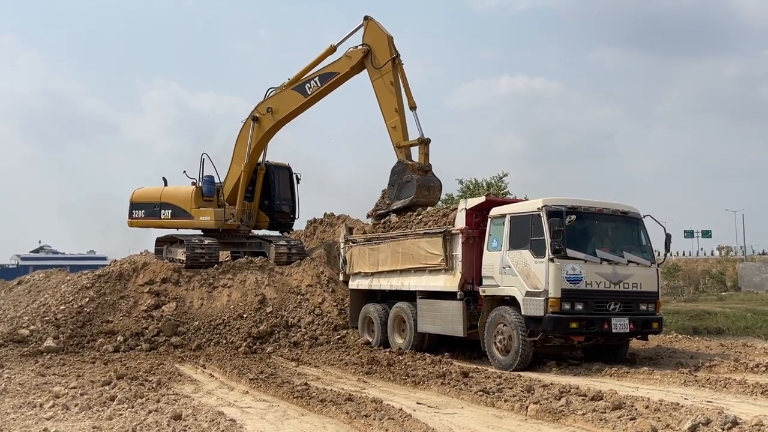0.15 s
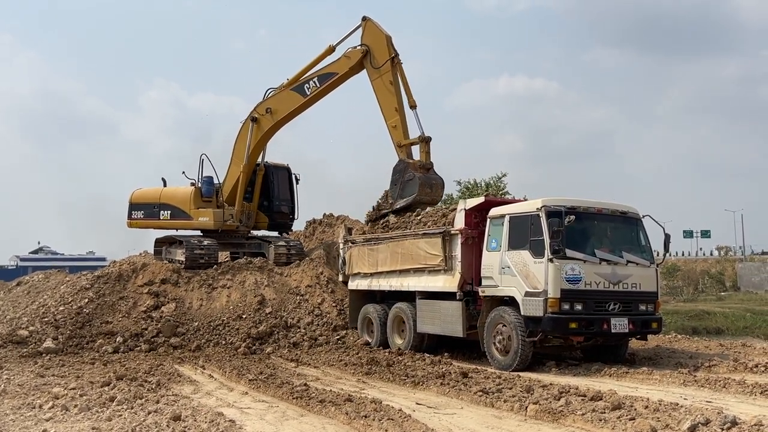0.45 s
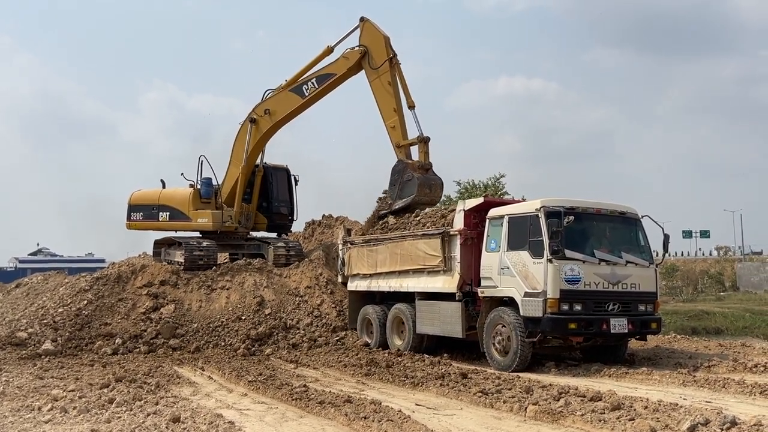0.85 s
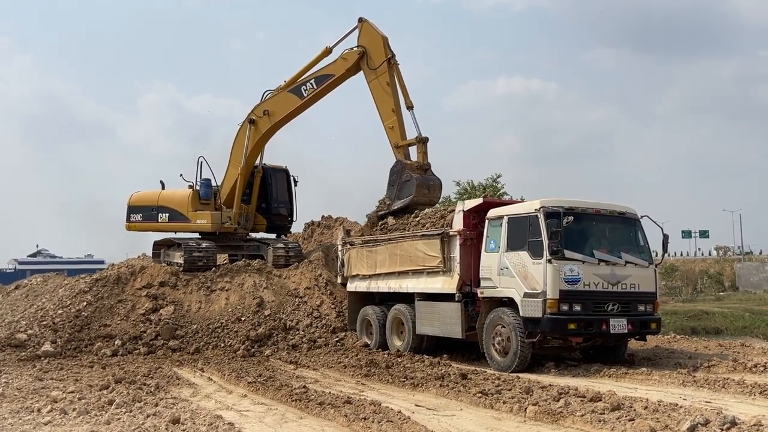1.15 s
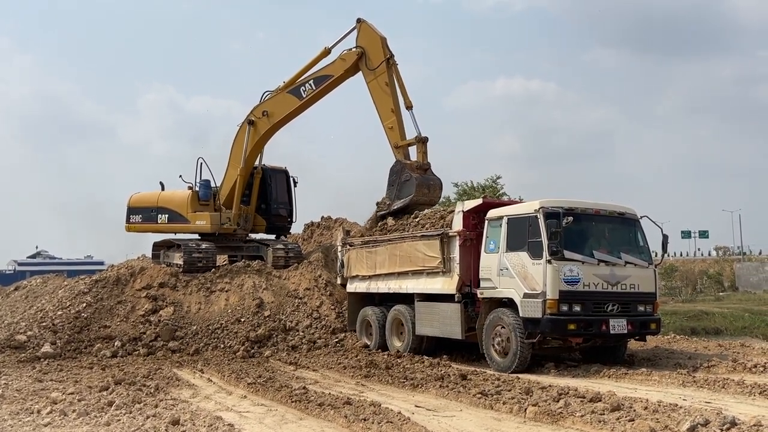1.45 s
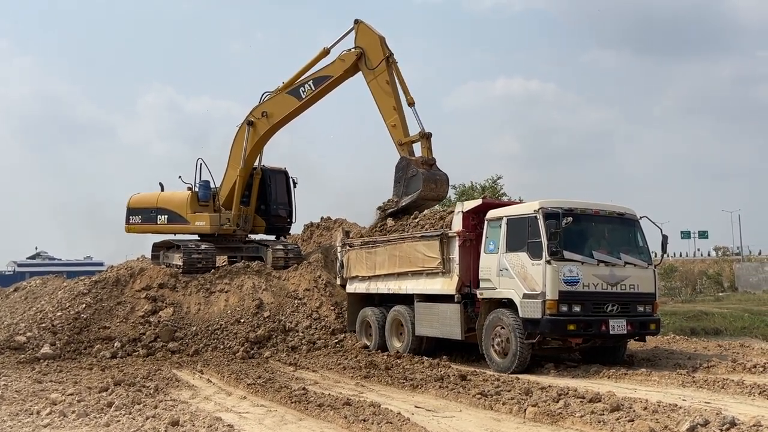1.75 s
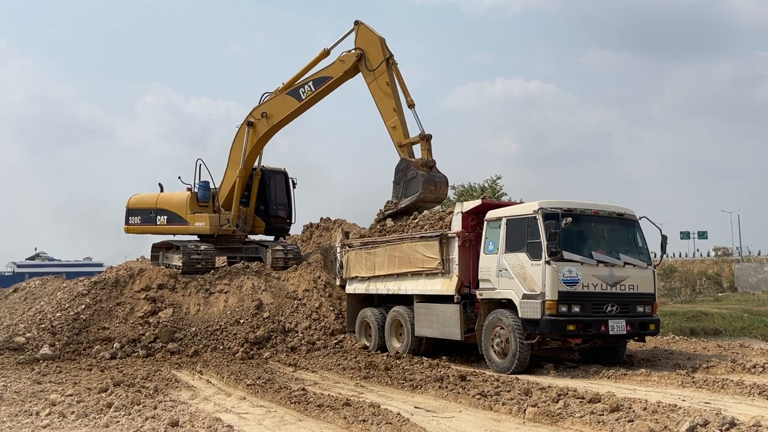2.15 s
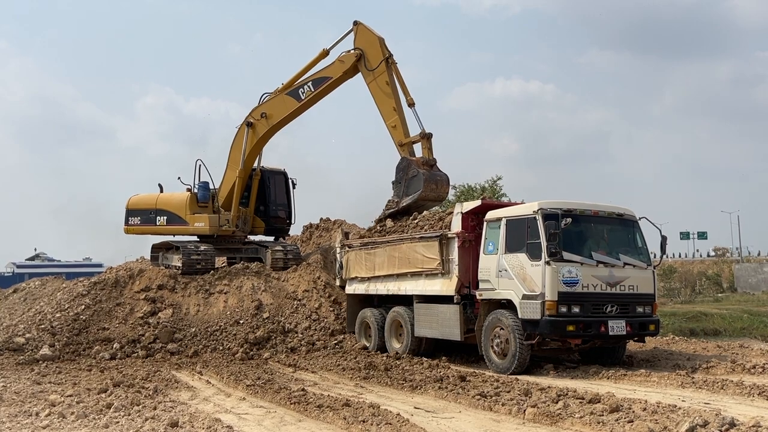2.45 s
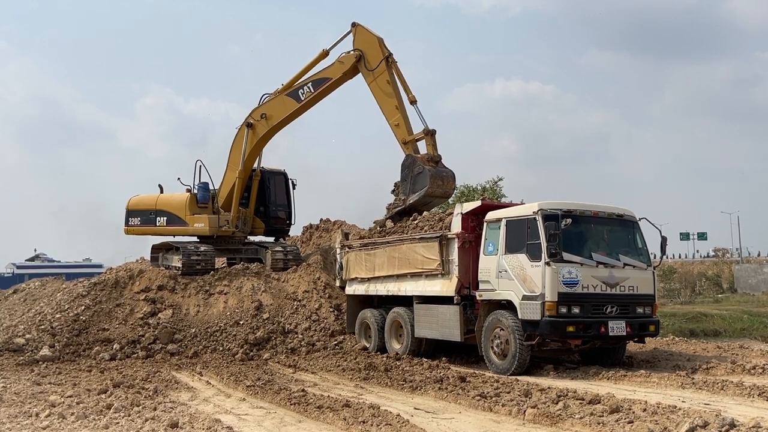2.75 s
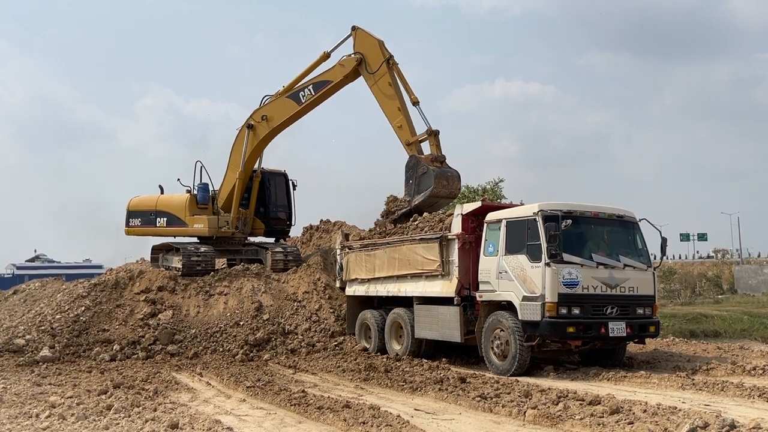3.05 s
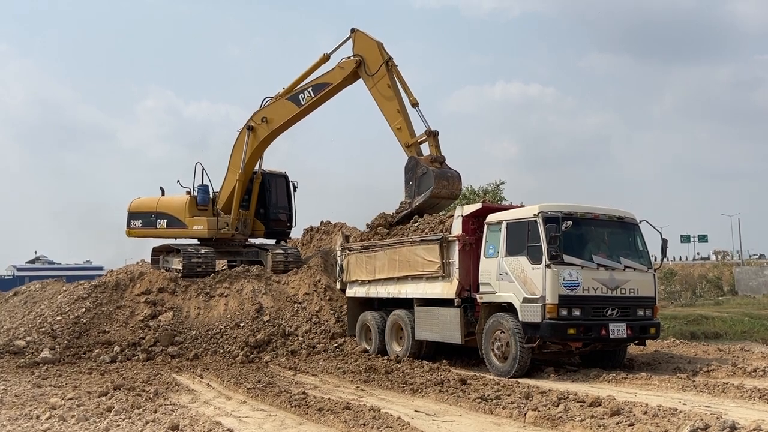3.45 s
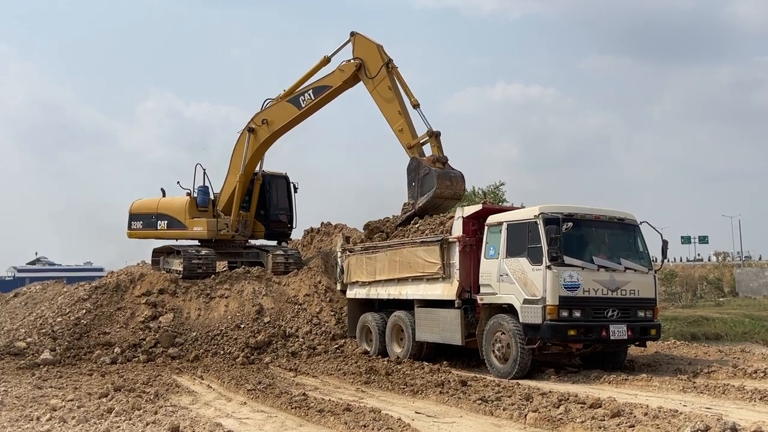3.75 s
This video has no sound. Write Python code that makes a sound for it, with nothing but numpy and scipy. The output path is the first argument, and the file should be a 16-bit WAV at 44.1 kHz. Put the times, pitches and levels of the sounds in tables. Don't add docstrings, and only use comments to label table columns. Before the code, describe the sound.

Excavator engine idling, steel bucket banging in bursts over a truck bed, with thudding earth and wind buffets

```python
import sys
import numpy as np
from scipy import signal
from scipy.fft import rfft, irfft
from scipy.io import wavfile
from scipy.ndimage import uniform_filter1d

SR = 44100
rng = np.random.default_rng(int(sys.argv[2]) if len(sys.argv) > 2 else 0)


def magnitude_from_level(level_db):
    exponent = np.asarray(level_db, float) / 20
    return 10 ** exponent


def output_pcm(signal):
    pcm = np.clip(np.atleast_2d(signal).T, -1, 1) * 32767
    wavfile.write(sys.argv[1], SR, np.round(pcm).astype(np.int16))


N = 171990
T = np.arange(N) / SR


def curve(rows, col=1):
    rows = np.array(rows, float)
    return np.interp(T, rows[:, 0], rows[:, col])


def noise():
    return rng.standard_normal(N)


def unit(x):
    return x / np.sqrt(np.mean(x ** 2))


def colour(x, points):
    f = np.arange(N // 2 + 1) * SR / N + 1
    p = np.array(points, float)
    db = np.interp(np.log(f), np.log(p[:, 0]), p[:, 1], left=-80, right=-80)
    return unit(irfft(rfft(x) * magnitude_from_level(db), N))


def band(hz, width):
    f = np.arange(N // 2 + 1) * SR / N
    return unit(irfft(rfft(noise()) / (1 + (2 * (f - hz) / width) ** 2), N))


def walk(rate):
    k = int(SR / rate)
    steps = np.repeat(rng.standard_normal(N // k + 1), k)
    y = uniform_filter1d(uniform_filter1d(steps, k), k)[:N]
    return y / np.std(y)


def tone(hz):
    return np.sin(2 * np.pi * np.cumsum(hz) / SR)


def add(out, s, x):
    i = max(int(s * SR), 0)
    out[..., i:i + x.shape[-1]] += x[..., :N - i]


def near_spot(modes, spot_hz, db_per_octave):
    return [(hz, db + db_per_octave * abs(np.log2(hz / spot_hz)), t60) for hz, db, t60 in modes]


def ring(modes, t, contact_s, tilt_db, scatter_db):
    hz, db, t60 = np.array(modes, float).T[:, :, None]
    chance, phase = rng.standard_normal((2, len(hz), 1))
    level = magnitude_from_level(db + tilt_db * np.log2(hz / 2500) + scatter_db * chance)
    decay = magnitude_from_level(-60 * t / np.minimum(t60, .6))
    y = (level * np.sin(2 * np.pi * hz * t + 9 * phase) * decay).sum(axis=0)
    return y * (1 - np.exp(-t / contact_s)) / np.max(np.abs(y))


def spread(mid, side):
    return np.array([mid + side, mid - side])


# pitch in Hz, density in dB.
SITE = [(30, -21.5), (140, -3), (200, -14.5), (320, -12), (480, -11.5), (900, -23), (2500, -33.5),
        (9500, -51)]
# time in seconds, level in dB.
HISS = [(0, -56), (1.4, -61), (1.75, -54), (2.0, -57.5), (2.55, -55.5), (2.9, -48.5), (3.4, -50.5),
        (3.6, -47), (3.8, -45.5), (3.9, -46)]
# pitch in Hz, density in dB.
HISS_COLOUR = [(1800, -35), (3600, -3), (6000, -6.5), (8500, -3), (10000, 1.5), (11600, -9.5),
               (12200, -22.5), (12900, -24)]
SITE_DB, SITE_SIDE_DB, FLICKER_DB, HISS_SIDE_DB = -32, -11.5, 0.8, -20.5


def site():
    rumble = [colour(noise(), SITE) * magnitude_from_level(FLICKER_DB * walk(21.91)) for _ in range(2)]
    hiss = [colour(noise(), HISS_COLOUR) * magnitude_from_level(curve(HISS)) for _ in range(2)]
    dull = signal.butter(8, 5900, fs=SR, output="sos")
    wide = magnitude_from_level(SITE_SIDE_DB) * signal.sosfilt(dull, rumble[1])
    return magnitude_from_level(SITE_DB) * spread(rumble[0], wide) + spread(hiss[0], magnitude_from_level(HISS_SIDE_DB) * hiss[1])


# pitch in Hz, width in Hz, level in dB, side in dB.
TRUCK = [(206, 10, -37.5, -9), (285, 9, -45, -7), (491, 30, -44, -16)]
# time in seconds, level in dB.
TRUCK_LOAD = [(0, 2.5), (.7, -21), (1.5, 2.5), (2.3, -3.5), (2.7, 2.5), (3.9, 0)]


def truck():
    out, throb = 0, magnitude_from_level(curve(TRUCK_LOAD))
    for hz, width, db, side_db in TRUCK:
        x = band(hz, width) * magnitude_from_level(db) * throb
        loose = 1.35 * magnitude_from_level(db) * band(hz, width)
        out = out + spread(x, magnitude_from_level(side_db) * (0.26 * x + loose))
    return out


# time in seconds, pitch in Hz, level in dB.
FAN = [(0, 488, -46), (1.5, 488, -46), (2.5, 487, -43), (3.2, 489, -42), (3.9, 486, -44)]
# time in seconds, level in dB.
GEAR = [(2.6, -62), (3.0, -50.5), (3.35, -44.5), (3.6, -49)]
# start in seconds, length in seconds, first pitch in Hz, last pitch in Hz, level in dB.
WHISTLES = [
    (.005, 0.048, 11220, 11300, -66),
    (3.814, 0.089, 10500, 11600, -47),
]


def whines():
    out = magnitude_from_level(curve(FAN, col=2) + 3.8 * walk(19)) * tone(curve(FAN) * (1 + 0.00585 * walk(15)))
    out = out + magnitude_from_level(curve(GEAR)) * band(1150, 240)
    for s, length, start_hz, end_hz, db in WHISTLES:
        u = np.clip((T - s) / length, 0, 1)
        hz = (start_hz + (end_hz - start_hz) * u) * (1 + .006 * walk(90))
        out = out + magnitude_from_level(db + 3 * walk(140)) * np.sin(np.pi * u) * tone(hz)
    return out


# centre in seconds, level in dB, pitch in Hz.
THUMPS = [(.145, -15, 79), (0.1797, -9, 121), (0.212, -17, 290), (0.2302, -8, 75), (0.268, -13, 200),
          (.333, -10, 84), (0.342, -28, 420), (0.366, -15.5, 168), (0.396, -12.5, 188), (0.426, -20, 63.4),
          (0.466, -14, 125), (0.493, -9, 110), (0.516, -8, 200), (0.5319, -1.5, 91), (0.547, -5.5, 300),
          (0.575, -15, 68), (0.846, -17, 185), (1.217, -19.5, 89), (1.811, -17, 66), (2.124, -16, 96.5),
          (2.201, -17, 91), (2.246, -12, 79.5)]
# pitch in Hz, density in dB.
WIND = [(38, -5), (55, 4), (100, 6.5), (180, 1), (320, -9), (900, -45)]
# time in seconds, level in dB.
BREEZE = [(.1, -26.5), (.55, -18.5), (.75, -40), (1.5, -39.5), (2.2, -25.5), (2.5, -36.5), (3.2, -33.5),
          (3.9, -51)]
THUMP_CYCLES, THUMP_DB, THUMP_SIDE_DB, FLUTTER_DB = 1.08, 0.5, -14.5, -13
OPENING_DB, OPENING_S = -13, .0018


def wind():
    mid, side, gate = np.zeros(N), np.zeros(N), np.zeros(N)
    for s, db, hz in THUMPS:
        a, b = rng.uniform(0, 2 * np.pi, 2)
        u = (T - s) * hz
        shape = magnitude_from_level(db + THUMP_DB) * np.exp(-(u / THUMP_CYCLES) ** 2 * 2)
        gate += shape
        mid += shape * np.cos(2 * np.pi * u + 0.083 * a)
        side += magnitude_from_level(THUMP_SIDE_DB) * shape * np.sin(2 * np.pi * u + b)
    breeze = magnitude_from_level(curve(BREEZE) + 0.86 * walk(14))
    flutter = magnitude_from_level(FLUTTER_DB) * gate * band(267, 276)
    mid += breeze * colour(noise(), WIND) + flutter + magnitude_from_level(OPENING_DB) * np.exp(-T / OPENING_S)
    side += magnitude_from_level(-6) * breeze * colour(noise(), WIND) + magnitude_from_level(-15) * flutter
    return spread(mid, side)


# start in seconds, peak in dB, pitch in Hz.
THUDS = [
    (.264, -17, 400),
    (.341, -18, 450),
    (.518, -15, 420),
    (.545, -16, 520),
    (1.912, -22, 430),
    (2.0155, -11.5, 380),
    (2.029, -14, 340),
    (2.15, -20, 330),
]
THUD_CYCLES = 5


def thuds():
    out, t = np.zeros(N), T[:SR // 10]
    for s, db, hz in THUDS:
        swing = np.sin(2 * np.pi * hz * t) + 0.25 * np.sin(2 * np.pi * 1.53 * hz * t)
        add(out, s, magnitude_from_level(db - 20 * t * hz / THUD_CYCLES) * swing)
    return out


# pitch in Hz, level in dB, 60 dB decay in seconds.
SHELL = [(384, 5.5, 0.13), (470, 3.5, 0.097), (592, -0.5, 0.18), (725, -4, 0.22), (812, -8, .11),
         (995, -2.5, 0.11), (1222, -1, 0.16), (1570, 1, 0.061), (1700, -7, 0.094), (1981, -3, 0.13),
         (2140, 0.5, 0.066), (2460, -1.5, 0.069), (2750, -3, 0.12), (3400, -2, 0.073)]
# start in seconds, peak in dB, pitch the spot favours in Hz.
STRIKES = [(.1276, -29, 2140), (.196, -33, 1500), (0.225, -29.5, 1300), (.5806, -20, 2100),
           (0.594, -25, 1900), (.598, -26, 3400), (.612, -25, 2750), (.63, -27, 2140), (.668, -32, 1570),
           (0.7908, -26, 1950), (.852, -32, 1570), (1.8334, -20, 2100), (1.8442, -15, 790),
           (1.849, -13.5, 1900), (1.868, -20, 1981), (1.884, -33, 2300), (1.928, -28, 2440),
           (2.028, -20, 592), (2.057, -18, 470), (2.0823, -12.5, 1950), (2.088, -16, 1150),
           (2.127, -20, 725), (2.8386, -36, 1000), (3.385, -19, 720), (3.397, -18, 1530), (3.436, -27, 720)]


def strikes():
    out, t = np.zeros(N), T[:SR // 4]
    for s, db, spot_hz in STRIKES:
        modes = near_spot(SHELL, spot_hz, -22.5)
        add(out, s, magnitude_from_level(db) * ring(modes, t, contact_s=0.0009, tilt_db=0, scatter_db=3.1))
    return out * magnitude_from_level(1.24 * walk(140))


# pitch in Hz, level in dB, 60 dB decay in seconds.
PIN = [(1892, 7.5, 0.05), (2839, 2.5, 0.088), (3656, -1, 0.085), (4040, -12, 0.057), (4500, -3.5, 0.063),
       (5270, -2.5, 0.078), (5800, -0.5, 0.043)]
# start in seconds, peak in dB, pitch the spot favours in Hz.
PINS = [
    (0.176, -23, 2800),
    (0.7637, -19.5, 3100),
    (0.809, -20.5, 4000),
    (2.058, -19, 2900),
    (2.081, -9, 3320),
    (3.246, -24, 2190),
    (3.3734, -14, 2900),
    (3.3927, -10.5, 2570),
    (3.404, -16.5, 3970),
]
PIN_DB, PIN_CONTACT_S, PIN_BUZZ_DB = -2, 0.00064, 0


def pins():
    out, t = np.zeros(N), T[:SR // 3]
    for s, db, spot_hz in PINS:
        modes = near_spot(PIN, spot_hz, -22)
        add(out, s, magnitude_from_level(db + PIN_DB) * ring(modes, t, PIN_CONTACT_S, tilt_db=0, scatter_db=0.64))
    return out * magnitude_from_level(PIN_BUZZ_DB * walk(130))


# start in seconds, level in dB.
HUMS = [
    (.588, -23.5),
    (1.93, -27),
]
HUM_HZ, HUM_T60_S = 443, 2.3


def hums():
    out, t = np.zeros(N), T[:SR // 3]
    for s, db in HUMS:
        swell = np.sin(np.pi * t / t[-1]) ** 0.12 * magnitude_from_level(3 * walk(29.4)[:len(t)])
        add(out, s, magnitude_from_level(db - 60 * t / HUM_T60_S) * np.sin(2 * np.pi * HUM_HZ * t) * swell)
    return out


# start in seconds, peak in dB, bed boom against it in dB,
# 60 dB decay in seconds, tilt in dB per octave.
CRASHES = [(0.121, -27.5, -20, 0.14, -3), (0.188, -21.5, -29, .22, -4), (0.5632, -26, 11, 0.18, -6.5),
           (0.5797, -13.5, -15, 0.084, 3), (0.591, -16.5, 8.5, 0.28, 1.8), (0.646, -31, -10, 0.36, -4),
           (0.7633, -27, 5, 0.3, -2.5), (0.808, -18.5, -5, 0.13, -2.5), (.8525, -23, 0, 0.065, -3),
           (1.7922, -28.5, -7, 0.16, -6.5), (1.8311, -12.5, -7, 0.11, -1.5), (1.843, -12, -1, 0.28, -4),
           (1.9294, -35, 10, 0.27, -3), (2.0125, -29, 7, 0.39, -10.5), (2.052, -16, -6, 0.35, -3),
           (2.081, -12, 1, 0.083, 4), (2.816, -26, -5, 0.059, -5), (2.8392, -24, -20, 0.098, -4.5),
           (3.2959, -29, -8, 0.12, -4), (3.374, -16, -6, 0.061, 3), (3.397, -11.5, -3, 0.14, -3.5)]
# pitch in Hz, level in dB.
STEEL = [(600, -4), (1000, -7.5), (1600, -0.5), (2300, 2.5), (3400, 3.5), (5000, -3.5), (7200, -4.5),
         (8800, -28)]
# pitch in Hz, level in dB, 60 dB decay in seconds.
BUCKET = [(1475, 8, 0.19), (1870, 8, 0.22), (2270, -28, 0.067), (1260, -5, .14), (4370, -8, 0.17),
          (4510, -31, 0.13)]
BED = [(353, 10, 0.099), (420, 5.5, 0.26), (497, 8, 0.1), (584, 3, 0.035), (804, -6, 0.24)]
CRASH_DB, BUCKET_DB, BOOM_DB, CRASH_RISE_S, TREBLE_FADE, PATCHY_DB = -9, -8.5, -0.5, 0.0023, 0.63, 3.5


def crashes():
    out, t = np.zeros(N), T[:SR // 3]
    bands = []
    for centre_hz, db in STEEL:
        for hz in (centre_hz * 0.82, centre_hz * 1.118):
            bands.append((hz, db, band(hz, 0.61 * hz) * magnitude_from_level(PATCHY_DB * walk(110))))
    for s, db, boom_db, t60, tilt_db in CRASHES:
        i = min(int(s * SR), N - len(t))
        roar = np.zeros(len(t))
        for hz, band_db, x in bands:
            fade_s = max(t60, .03) * (hz / 2000) ** -TREBLE_FADE
            roar += magnitude_from_level(band_db + tilt_db * np.log2(hz / 2000) - 60 * t / fade_s) * x[i:i + len(t)]
        roar = roar * (1 - np.exp(-t / CRASH_RISE_S)) / 3
        bucket = ring(BUCKET, t, CRASH_RISE_S, tilt_db, scatter_db=3) * magnitude_from_level(-30 * t / t60)
        bed = ring(BED, t, contact_s=0.0021, tilt_db=0, scatter_db=1.2)
        crash = magnitude_from_level(CRASH_DB) * roar + magnitude_from_level(BUCKET_DB) * bucket + magnitude_from_level(boom_db + BOOM_DB) * bed
        add(out, s, magnitude_from_level(db) * crash)
    return out


def steel():
    dull = signal.butter(6, 10600, fs=SR, output="sos")
    return signal.sosfilt(dull, crashes() + hums() + pins()) * magnitude_from_level([[.1], [-.1]])


# time in seconds, sixth-order tone in Hz, level in dB.
ENGINE = [(0, 131, -31), (.9, 135, -32.5), (1.4, 133.5, -30), (1.7, 127, -29), (2.05, 134.5, -28),
          (2.4, 134, -28), (2.62, 126.5, -28.5), (3.22, 123.5, -27), (3.4, 130, -28), (3.6, 126.5, -28),
          (3.9, 127.5, -30)]
# order, level against the sixth in dB.
ORDERS_DB = [(2, -11), (3, -11.5), (4, -7), (5, -16), (6, -1.5), (8, -11), (9, -11.5), (10, -11.5)]
# time in seconds, pitch in Hz, level in dB.
DRONE = [(0, 50.3, -22), (.12, 55.35, -25), (1.5, 58, -51), (1.85, 57.7, -24), (2.3, 57.4, -45),
         (2.65, 54.8, -31), (2.9, 54, -25.5), (3.4, 57, -25), (3.9, 55, -25.5)]
ORDER_WOBBLE_DB, SPEED_JITTER = 1.3, .003


def excavator():
    turn = 2 * np.pi * np.cumsum(curve(ENGINE) * (1 + SPEED_JITTER * walk(12))) / SR / 6
    orders = np.zeros(N)
    for k, db in ORDERS_DB:
        orders += magnitude_from_level(db + ORDER_WOBBLE_DB * walk(6.34)) * np.sin(int(round(k)) * turn + k * k)
    drone = magnitude_from_level(curve(DRONE, col=2) + 0.71 * walk(7.9)) * tone(curve(DRONE) * (1 + 0.01333 * walk(8.63)))
    return np.sqrt(2) * (orders * magnitude_from_level(curve(ENGINE, col=2)) + drone)


# pitch in Hz, lead of left over right in radians.
PORTS = [(0, 0), (3000, .8), (5300, .8), (6300, 0), (7500, 0), (7900, .6), (8600, 0), (9250, -1.6),
         (10300, -3.14), (11700, -6.28)]


def scene():
    far = site() + truck() + whines() + thuds() + strikes() + steel() + excavator()
    f, p = np.arange(N // 2 + 1) * SR / N, np.array(PORTS, float)
    lead = np.exp(.5j * np.interp(f, p[:, 0], p[:, 1]))
    return irfft(rfft(far) * np.array([lead, 1 / lead]), N) + wind()


def roll_off(x):
    return signal.sosfilt(signal.butter(12, 12650, fs=SR, output="sos"), x)


def record(dry):
    x = signal.sosfilt(signal.butter(4, 42, "high", fs=SR, output="sos"), dry)
    x = np.tanh(1.076 * x) / 1.136
    x = signal.sosfilt(signal.butter(10, 12700, fs=SR, output="sos"), x)
    return roll_off(x)


dry = scene()
out = record(dry)
output_pcm(out)
```